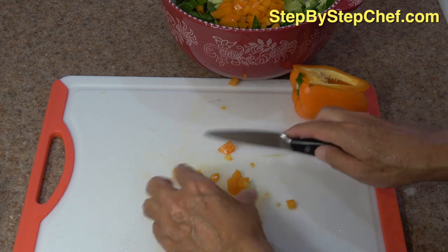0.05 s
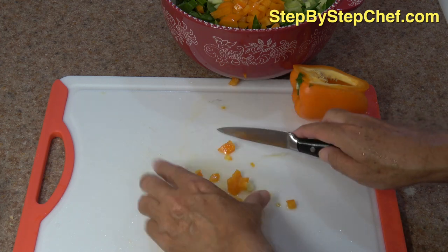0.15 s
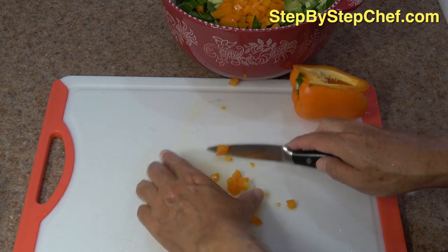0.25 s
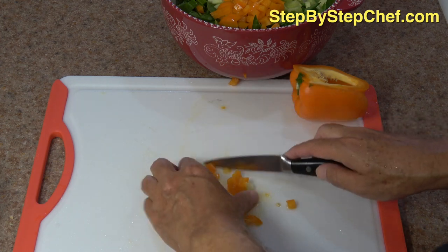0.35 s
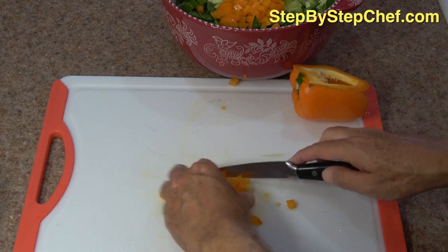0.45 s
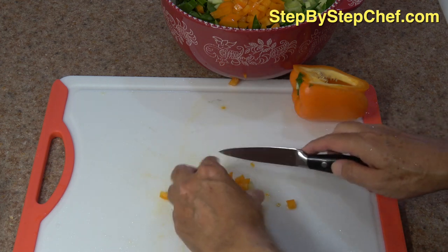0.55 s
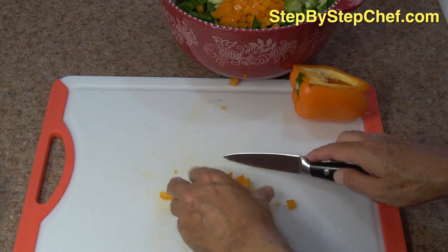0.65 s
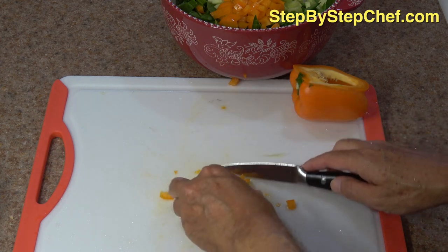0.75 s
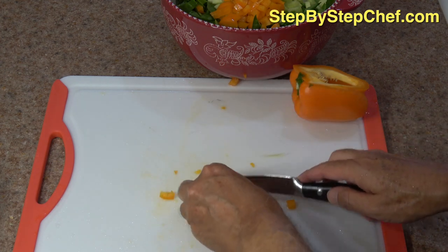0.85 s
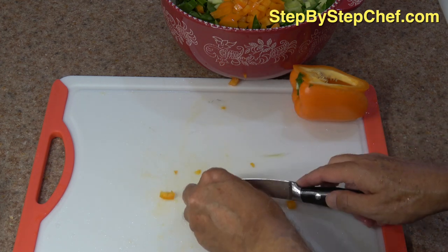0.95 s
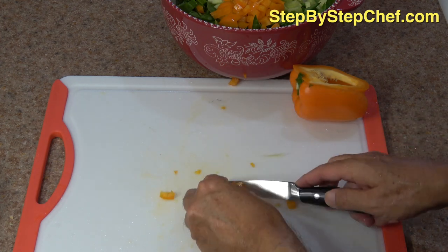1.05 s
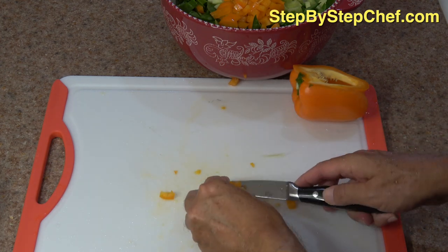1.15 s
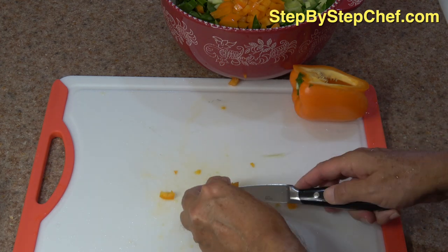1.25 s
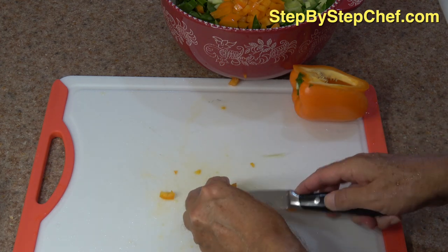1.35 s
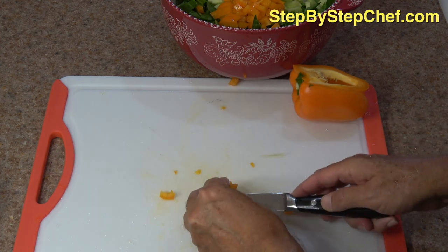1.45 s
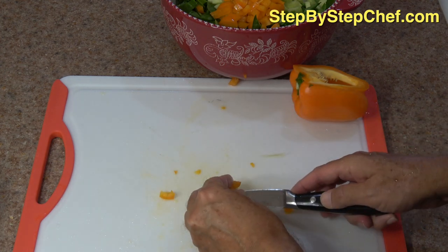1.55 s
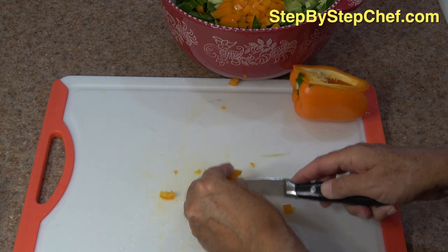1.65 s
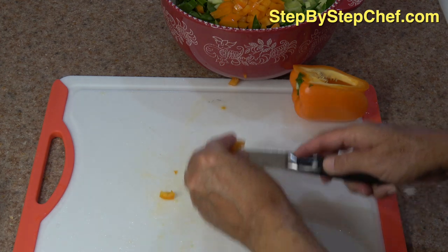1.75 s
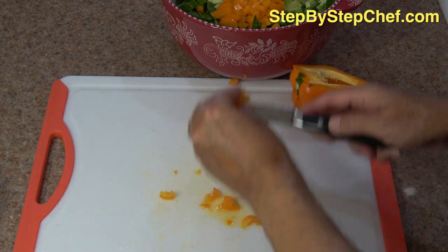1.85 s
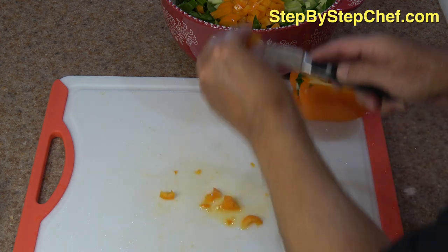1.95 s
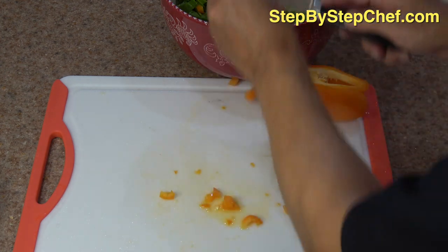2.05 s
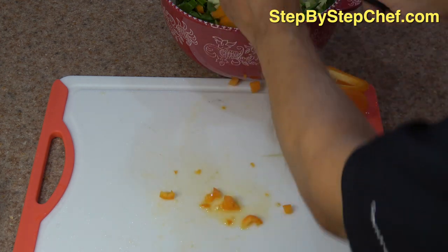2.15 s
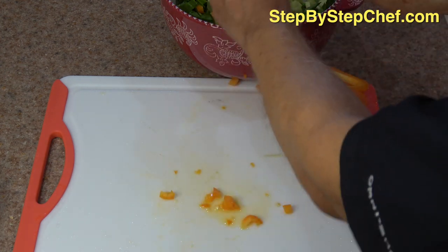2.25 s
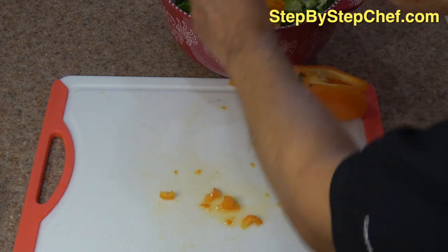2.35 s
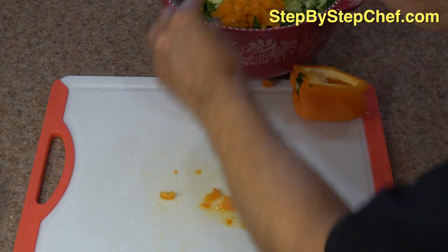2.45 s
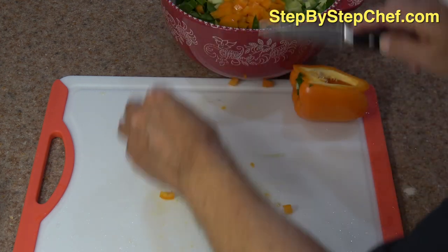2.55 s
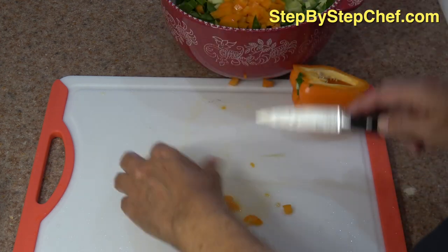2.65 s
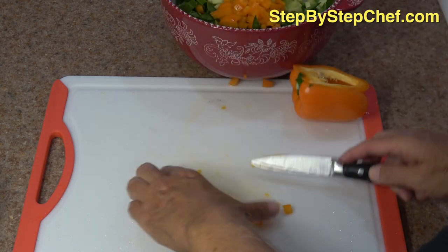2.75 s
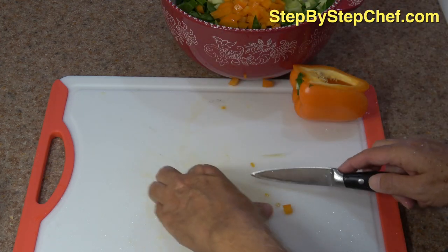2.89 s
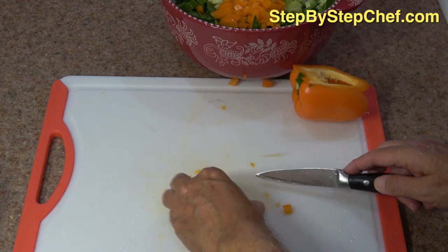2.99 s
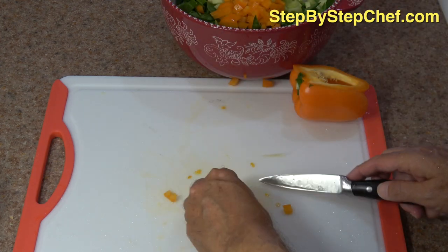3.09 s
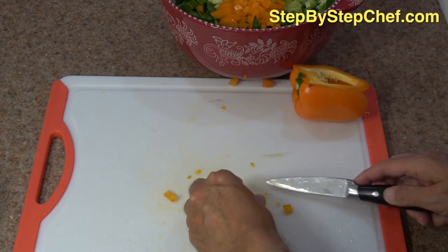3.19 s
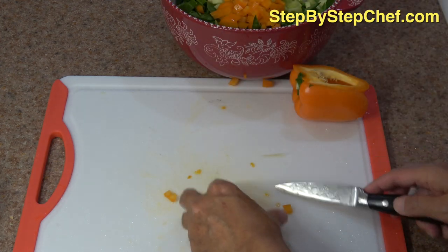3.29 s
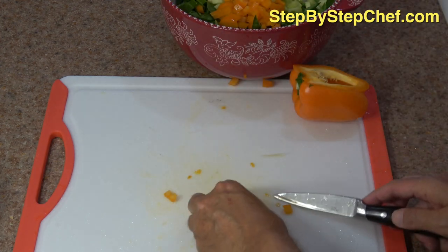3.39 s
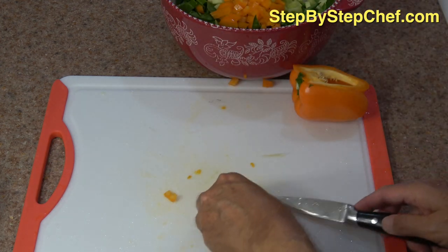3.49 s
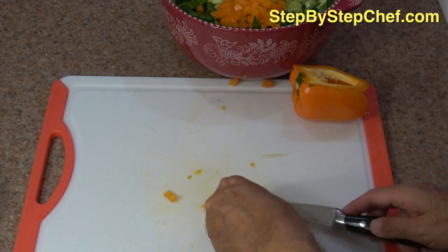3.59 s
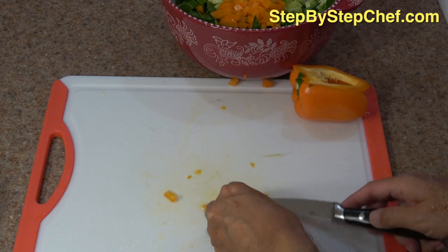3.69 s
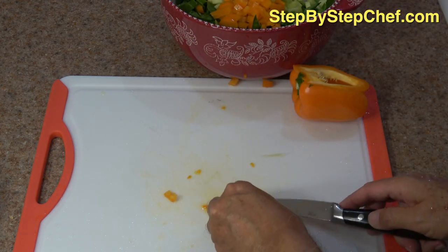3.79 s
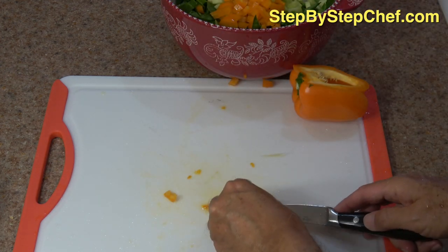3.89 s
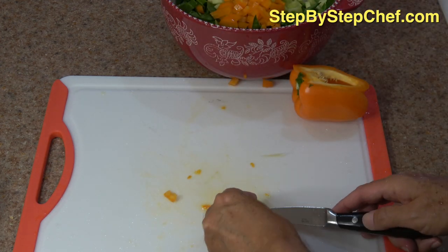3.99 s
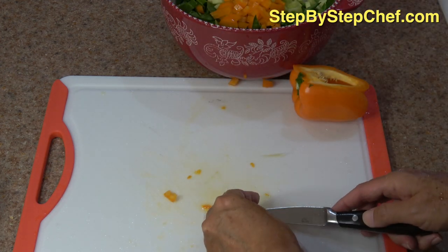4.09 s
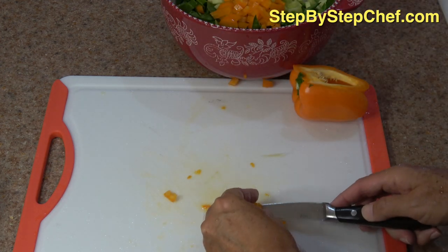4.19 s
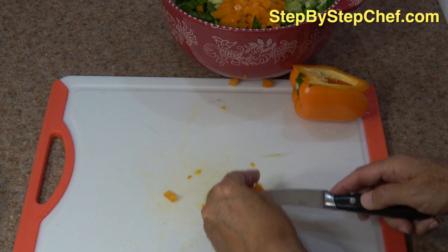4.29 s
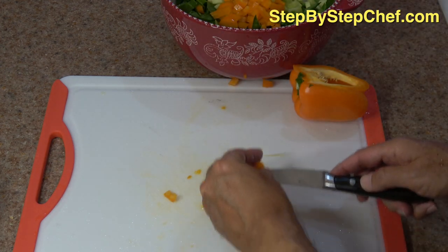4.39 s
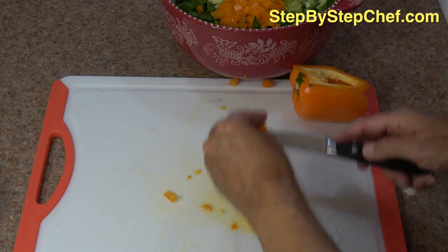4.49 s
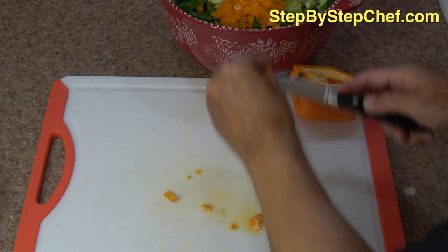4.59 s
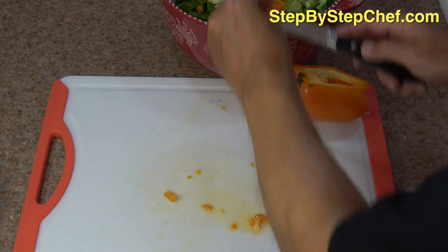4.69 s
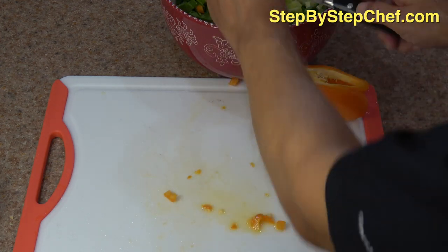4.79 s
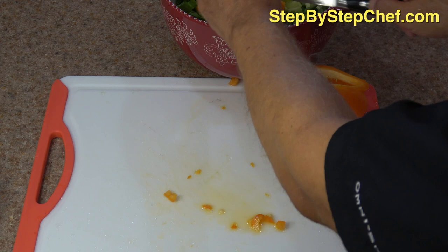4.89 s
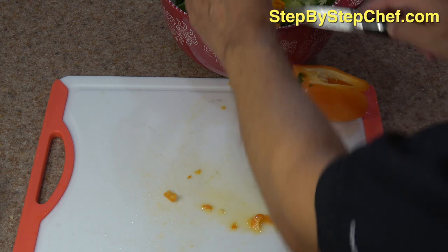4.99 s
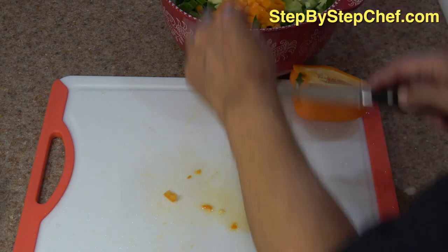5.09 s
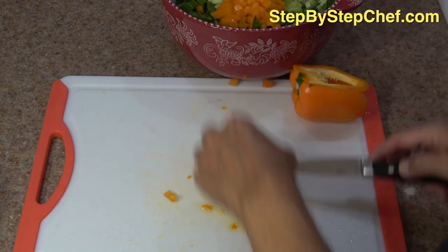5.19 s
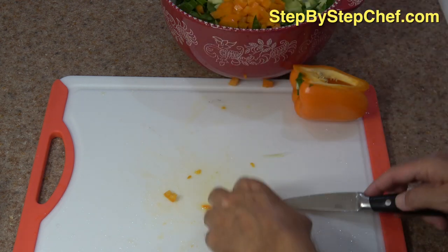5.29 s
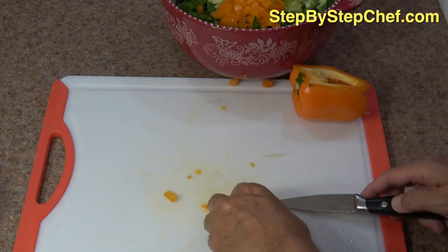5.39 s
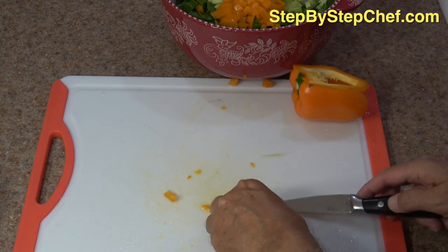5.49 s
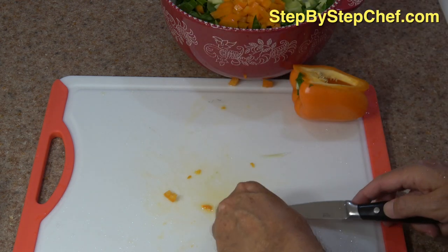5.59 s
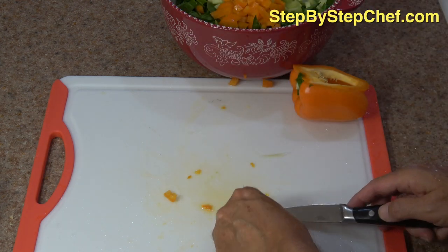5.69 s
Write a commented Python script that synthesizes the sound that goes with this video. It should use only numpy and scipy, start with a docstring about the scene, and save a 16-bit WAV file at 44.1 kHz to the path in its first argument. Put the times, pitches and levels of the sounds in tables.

```python
"""Diced pepper on a cutting board

Close by in a small kitchen, a hand and a small knife gather diced pepper on a plastic board for a bowl.
Pieces judder and crunch: stick-slip noise and force pulses ring the board, with short decaying tones.
The blade scrapes and taps through its own resonances; a sleeve swishes as filtered noise.
A bowl bump and a sharp rap are dying modes; behind them lie a motor hum, fan noise, hiss and a room tail.
"""
import sys
import numpy as np
from scipy import signal
from scipy.fft import rfft, irfft, next_fast_len
from scipy.io import wavfile
from scipy.ndimage import map_coordinates

SR = 44100
rng = np.random.default_rng(int(sys.argv[2]) if len(sys.argv) > 2 else 0)


def dump_mix(stems):
    """Bounce the given channels to the path in sys.argv[1] as a 16-bit WAV at rate SR."""
    frames = np.atleast_2d(stems).T  # one column per channel
    limited = np.clip(frames, -1, 1)  # hard clip at full scale
    pcm = np.round(limited * 32767).astype(np.int16)
    wavfile.write(sys.argv[1], SR, pcm)


N = 253134  # samples


def amp(db):
    """Decibels to gain."""
    return 10 ** (np.asarray(db) / 20)


def unit(x):
    """Scale to rms 1."""
    return x / np.sqrt(np.mean(x ** 2) + 1e-20)


def along(points, hz):
    """Values of (f/Hz, value) points, read on a log frequency axis."""
    f, v = np.transpose(points)
    return np.interp(np.log(hz + 1), np.log(f), v)


def swell(t, peak_s, half_s):
    """A bell-shaped gain that falls to 1/e at half_s either side of its peak."""
    return np.exp(-((t - peak_s) / half_s) ** 2)


def wobble(rate):
    """A smooth random curve, rate knots a second."""
    knots = rng.standard_normal(int(N * rate / SR) + 4)
    return map_coordinates(knots, [np.arange(N) * rate / SR])


def filtered(x, response):
    """Sound shaped by a response of frequency."""
    m = next_fast_len(N + SR // 2)
    return irfft(rfft(x, m) * response(np.fft.rfftfreq(m, 1 / SR)), m)[..., :N]


def convolved(x, response):
    """Sound rung through an impulse response."""
    return signal.fftconvolve(x, response)[:N]


def gains(strokes, rise_s, sag_db_per_s):
    """Rise, sagging hold and fade of each stroke, one gain curve per dB column; rise and fade span 20 dB."""
    t, total = np.arange(N) / SR, 0
    for start_s, hold_s, fade_s, *levels_db in strokes:
        early = np.maximum(start_s - t, 0)
        late = np.maximum(t - start_s - hold_s, 0)
        sag_db = sag_db_per_s * np.clip(t - start_s, 0, hold_s)
        shape_db = -20 * (early / rise_s + late / fade_s) - sag_db
        total = total + np.outer(amp(levels_db), amp(shape_db))
    return total


def body(colour, modes, lo_hz, hi_hz, size=8192, order=8):
    """Minimum-phase impulse response, of energy 1, of one band of a resonant object."""
    hz = np.fft.rfftfreq(size, 1 / SR) + 1
    peaks_db = sum(lift / (1 + (2 * (hz - f) / width) ** 2) for f, width, lift in modes)
    low_cut = 1 + (lo_hz / hz) ** (2 * order)
    high_cut = 1 + (hz / hi_hz) ** (2 * order)
    gain = amp(along(colour, hz) + peaks_db) / np.sqrt(low_cut * high_cut)
    # folding the cepstrum puts all the sound after the blow
    cepstrum = irfft(np.log(gain + 1e-5))
    cepstrum[1:size // 2] *= 2
    cepstrum[size // 2 + 1:] = 0
    response = irfft(np.exp(rfft(cepstrum)))
    return response / np.linalg.norm(response)


def ringing(modes):
    """Impulse response, of energy 1, of a few narrow modes with exponential decay."""
    t = np.arange(SR // 4) / SR
    response = sum(amp(db) * np.exp(-np.pi * width * t) * np.sin(2 * np.pi * hz * t)
                   for hz, width, db in modes)
    # a plate radiates little below its lowest mode
    highpass = signal.butter(4, .8 * modes[0][0], "high", fs=SR, output="sos")
    response = signal.sosfilt(highpass, response)
    return response / np.linalg.norm(response)


def slips(rate, spread_db, smooth_db, clump_db):
    """Stick-slip force of rms 1: clumps of sudden, uneven releases over smooth rubbing."""
    signs = rng.choice([-1, 1], N)
    sizes = amp(spread_db * np.clip(rng.standard_normal(N), -2, 2)) * signs
    releases = unit(sizes * (rng.random(N) < rate / SR))
    force = releases + amp(smooth_db) * rng.standard_normal(N)
    return unit(force * amp(clump_db * np.tanh(wobble(160))))


def blows(times, levels_db, hardness_hz, chatter_db, chatter_s, size=2048):
    """One force pulse per contact and a brief chatter; a softer contact carries less treble."""
    force = np.zeros(N + size)
    fade = amp(chatter_db) * np.exp(-np.arange(size) / SR / chatter_s)
    for s, db, hz in zip(times, levels_db, hardness_hz):
        contact = signal.unit_impulse(size) + fade * rng.standard_normal(size)
        lowpass = signal.butter(2, min(hz, SR / 2 - 1), fs=SR)
        force[round(s * SR):][:size] += amp(db) * signal.lfilter(*lowpass, contact)
    return force[:N]


def struck(event, modes, crack_db, crack_s, crack_hz, attack_s, order):
    """A single blow: a short low-passed crack and freely dying modes; crack_s is its 60 dB decay."""
    s, db = event
    t = np.arange(SR // 2) / SR
    ring = sum(amp(level - 60 * t / t60) * np.sin(2 * np.pi * (hz * t + rng.random()))
               for hz, level, t60 in modes)
    lowpass = signal.butter(order, crack_hz, fs=SR, output="sos")
    noise = unit(signal.sosfilt(lowpass, rng.standard_normal(len(t))))
    crack = amp(crack_db - 60 * t / crack_s) * noise
    blow = (ring + crack) * (1 - np.exp(-t / attack_s))
    # a small body radiates little bass
    blow = signal.sosfilt(signal.butter(2, 180, "high", fs=SR, output="sos"), blow)
    return amp(db) * np.pad(blow, (round(s * SR), N))[:N]


def hiss():
    """Faint shaped noise, opposite in the two channels."""
    floor = [(25, 10), (110, 21), (300, 13.5), (1200, 14.0),
             (2200, -9), (4500, -20), (6000, 5.5), (15000, -7.5)]  # colour: f/Hz, relative level/dB
    side = amp(-64) * unit(filtered(rng.standard_normal(N), lambda hz: amp(along(floor, hz))))
    return np.array([side, -side])


def appliance():
    """A slightly unsteady hum of motor harmonics, with the rush of its fan as shaped noise."""
    # motor harmonics: f/Hz, relative level/dB, left minus right/dB
    harmonics = [(57.7, -13.5, 2), (115.7, 0, 3.5), (173.3, -2, 2), (234, -10, 4), (283, -31, 1)]
    # colour of the fan's rush: f/Hz, relative level/dB
    fan_colour = [(20, -6.5), (32, -1), (42, -14), (60, -0.5), (88, 1), (140, -6), (220, -9.5), (330, -9),
                  (550, -14), (700, -9.5), (950, -12), (1100, -7.5), (1270, -11), (1430, -21),
                  (2100, -27.5), (15500, -37)]
    motor_db, waver_db = -51.5, 0.5  # gain of the whole hum and its slow wavering
    t, hum = np.arange(N) / SR, 0
    for hz, db, pan_db in harmonics:
        phase = 2 * np.pi * (hz * t + rng.random()) + 0.2 * wobble(2.99)
        tone = np.sqrt(2) * np.sin(phase)
        hum = hum + tone * amp(db + 0.94 * wobble(3.14)) * amp([[pan_db / 2], [-pan_db / 2]])
    rush = unit(filtered(rng.standard_normal(N), lambda hz: amp(along(fan_colour, hz))))
    return amp(motor_db + waver_db * wobble(3.96)) * hum + amp(-52.0) * rush


def reverb(x):
    """The kitchen's diffuse tail: decaying noise in which each frequency dies at its own speed."""
    # decay of the room: f/Hz, t60/s
    kitchen = [(150, 0.74), (600, 0.41), (1500, 0.41), (3500, 0.35), (7000, 0.43), (14000, 0.36)]
    hz, t, z = signal.stft(rng.standard_normal(SR * 3 // 4), SR, nperseg=256)
    decay = amp(-60 * t / along(kitchen, hz)[:, None])
    tail = signal.istft(z * decay, SR, nperseg=256)[1]
    delay = np.zeros(SR // 160)  # about 6 ms before the tail
    return convolved(x, np.concatenate([delay, tail / np.linalg.norm(tail)]))


def sleeve():
    """Cloth fibres slide softly, loudest as the arm moves fastest to the bowl and back."""
    # swings of the arm: fastest moment t/s, half length/s, swish level/dB
    swings = [(2.17, 0.14, -56), (2.52, 0.19, -62.5), (4.79, 0.15, -56.5), (5.164, 0.19, -61)]
    # colour of the cloth: f/Hz, relative level/dB
    cloth = [(400, -6), (1000, 0.5), (2000, 2), (4000, -2), (8000, -5), (11000, -9.5), (15500, -21)]
    fibres = slips(rate=3000, spread_db=11.0, smooth_db=4.5, clump_db=0.0)
    t = np.arange(N) / SR
    speed = sum(amp(db) * swell(t, s, half_s) for s, half_s, db in swings)
    return speed * unit(filtered(fibres, lambda hz: amp(along(cloth, hz))))


def bowl():
    """The bowl is bumped once: its modes die freely behind a dull crack."""
    # the bump: t/s, level/dB
    bump = (2.0995, -27)
    # modes of the bowl: f/Hz, relative level/dB, t60/s
    modes = [(275, -7.5, 0.046), (442, -6.5, 0.032), (654, -8, 0.093), (740, 3.5, 0.043), (870, -1, 0.066),
             (1050, -4, 0.025), (1180, -2, 0.029), (1360, -3, 0.019)]
    return struck(bump, modes, crack_db=-1.5, crack_s=0.033, crack_hz=1300, attack_s=0.00057, order=4)


def rap():
    """One sharp rap on the board: short modes and a bright crack."""
    # the rap: t/s, level/dB
    hit = (2.859, -14)
    # modes it excites: f/Hz, relative level/dB, t60/s
    modes = [(273, -13.5, 0.059), (383, -19.5, 0.12), (750, 1, 0.043), (1593, -7.5, 0.027),
             (2710, -8.5, 0.019), (3060, -4.5, 0.016), (3260, -7.5, 0.027), (3650, -4, 0.021),
             (5400, -5, 0.0084), (9020, -16.5, 0.012)]
    return struck(hit, modes, crack_db=-10.0, crack_s=0.017, crack_hz=4500, attack_s=0.00024, order=2)


def knife():
    """The edge catches on the scored plastic; the catches set the steel singing, and its taps tick."""
    # strokes over the board: t/s, hold/s, fade/s, relative body/dB, rasp/dB, edge hiss/dB,
    # steel ring against rasp/dB
    scrapes = [(0.405, 0.025, 0.1, -41, -42, -49, -25), (1.234, 0.01, 0.028, -44, -57, -54, -21.5),
               (1.274, 0.0056, 0.066, -42, -44.5, -53, -20), (1.413, 0.008, 0.068, -43.5, -43, -49, -27),
               (1.433, 0.016, 0.022, -37.5, -48.5, -59, -28), (3.509, 0.061, 0.047, -33, -37.5, -50, -8),
               (3.589, 0.008, 0.049, -33, -35.5, -45, -2), (3.605, 0.0073, 0.18, -37.5, -38.5, -56, -19),
               (3.809, 0.012, 0.08, -37, -42, -55, -1), (3.898, 0.0048, 0.024, -34.5, -30.5, -44, -3.5),
               (3.942, 0.0055, 0.084, -40.5, -42.5, -50.5, -3),
               (4.031, 0.008, 0.086, -45, -47, -56.5, -5.5), (5.359, 0.008, 0.17, -54, -56.5, -72, -20),
               (5.515, 0.017, 0.035, -50.5, -59, -60, 2), (5.573, 0.013, 0.046, -37, -36.5, -47, -1.5),
               (5.644, 0.011, 0.031, -38.5, -49, -53.5, 3), (5.692, 0.0051, 0.029, -41, -43.5, -58, -2)]
    # ticks of the blade: t/s, relative level/dB, contact hardness as cutoff f/Hz
    tick_rows = [(0.183, -14, 8400), (0.24, -33, 14000), (1.2757, -31, 12300), (1.41, -36.5, 12100),
                 (2.356, -40, 14000), (2.6814, -34, 4520), (3.091, -23.5, 4900), (3.3529, -38, 5000),
                 (3.5, -30.5, 6000), (3.587, -26, 8100), (3.7998, -26.5, 8800), (3.897, -19, 12100),
                 (3.946, -25, 9000), (5.361, -33.5, 3500), (5.5663, -25.5, 9000), (5.6899, -27, 12000)]
    # broad colour of the scrape: f/Hz, relative level/dB
    colour = [(120, -19.5), (270, -1), (490, -11.5), (700, -1.5), (870, -9.5), (1150, -7), (1600, -9),
              (2050, -23.5), (2700, -14.5), (3700, -15), (5600, -17.5), (9000, -25), (12500, -37.5),
              (15500, -55)]
    # resonances that stand out of it: f/Hz, width/Hz, lift/dB
    modes = [(1037, 57, 7.3), (1590, 130, 4.3), (2530, 150, 4.5), (3336, 190, 7), (4200, 72, 3.6),
             (6640, 160, 7.7), (8630, 580, 8.4), (11300, 370, 10)]
    # the steel's ringing modes: f/Hz, width/Hz, relative level/dB
    blade = [(2740, 44, -5), (3070, 110, 4), (3324, 34, -0.5), (4540, 35, -16), (4980, 34, -4)]
    strokes = [(*timing, db, rasp_db, edge_db, rasp_db + ring_db)
               for *timing, db, rasp_db, edge_db, ring_db in scrapes]
    # the edge bites fast
    body_gain, rasp_gain, edge_gain, ring_gain = gains(strokes, rise_s=0.015, sag_db_per_s=29)
    catches = slips(rate=1300, spread_db=7.5, smooth_db=2.5, clump_db=1.5)
    drone = convolved(catches * body_gain, body(colour, modes, 145, 2260))
    rasp = convolved(catches * rasp_gain, body(colour, modes, 1890, 4960))
    edge = convolved(catches * edge_gain, body(colour, modes, 5440, 17000))
    ring = convolved(catches * ring_gain, ringing(blade))
    tick = body(colour, modes, 1570, 17000)
    taps = blows(*np.transpose(tick_rows), chatter_db=-13.5, chatter_s=0.0088)
    ticks = convolved(taps, tick / np.abs(tick).max())
    return amp(-2.5) * drone + amp(-6.5) * (rasp + ring) + amp(-5.0) * edge + amp(-7.0) * ticks


def slip_run():
    """The hand sticks and slips in a quick, even run that swells and dies away, as rows of knocks."""
    start_s, period_s, count = 0.2417, 0.0187, 5
    peak_s, half_s = 0.267, 0.037
    strongest_db, snap_db, hardness_hz = -3.5, -4.5, 5400  # strength at the peak, snap against body
    times = start_s + period_s * np.arange(count)
    levels_db = strongest_db + 20 * np.log10(swell(times, peak_s, half_s))
    return [(s, db, snap_db, hardness_hz) for s, db in zip(times, levels_db)]


def crunches(size=640, count=2000):
    """Sparse crisp crunches of rms 1, each ringing briefly at a pitch of its own."""
    rate_per_s, centre_hz, log_spread = 220, 3690, 0.13
    life_cycles, scatter_db = 5, 3
    pitch, strength = rng.standard_normal((count, 2)).T
    starts = np.cumsum(rng.exponential(SR / rate_per_s, count)).astype(int)
    cycles = np.outer(centre_hz * np.exp(log_spread * pitch), np.arange(size) / SR)
    sizes = amp(scatter_db * np.clip(strength, -2, 2))[:, None]
    grains = sizes * np.sin(2 * np.pi * cycles) * np.exp(-cycles / life_cycles)
    places = starts[:, None] + np.arange(size)
    return unit(np.bincount(places.ravel(), grains.ravel(), N)[:N])


def board():
    """Wet pieces judder under the hand; slips and knocks ring the same plastic board."""
    # pushes of the pieces: t/s, hold/s, fade/s, relative body/dB, rasp/dB,
    # hand's weight against body/dB, crunch against rasp/dB
    sweeps = [(0.0, 0.012, 0.12, -35, -44, -14, -4.5), (0.2, 0.019, 0.032, -30.5, -41.5, -22, -1),
              (0.245, 0.071, 0.19, -16, -29.5, -17.5, -5.5), (0.772, 0.051, 0.087, -20, -27.5, -4, -16),
              (0.87, 0.057, 0.032, -21, -31, -5, -11), (0.981, 0.067, 0.13, -33.5, -42.5, -15, -17),
              (1.201, 0.01, 0.065, -46, -65, 2, -12), (2.79, 0.0061, 0.031, -38, -54, -16, -12),
              (2.829, 0.042, 0.028, -29.5, -44.5, -11, -15), (2.915, 0.0088, 0.15, -43, -45.5, -11, -14),
              (2.962, 0.021, 0.16, -34, -44, -22, -15), (3.08, 0.016, 0.075, -39.5, -40.5, -20, -12),
              (3.478, 0.012, 0.054, -43.5, -61, -20, -10)]
    # knocks on the board: t/s, relative level/dB, snap against body/dB, contact hardness as cutoff f/Hz
    knocks = [(0.1834, -4.5, -2, 7900), (0.668, -6.5, 11.5, 540), (0.767, -11.5, -7, 3000),
              (0.8673, -12, -19, 5000), (0.9253, -14, 0, 3470), (1.077, -16, -14, 1170),
              (2.7879, -25.5, -3, 2500), (2.8273, -23, -5, 4000), (2.8584, -19, 7, 8000),
              (3.197, -28.5, 2.5, 4560)]
    # broad colour of the board: f/Hz, relative level/dB
    colour = [(90, -24), (170, -28), (240, -8.5), (400, -9.5), (520, -15), (720, -3.5), (1050, -8),
              (1550, -13.5), (1900, -27), (2500, -18), (4000, -24), (5500, -37.5), (9000, -44),
              (15500, -66)]
    # resonances that stand out of it: f/Hz, width/Hz, lift/dB
    modes = [(266, 24, 12), (286, 13, 9), (390, 25, 3.5), (663, 48, 3), (781, 42, 8.5), (950, 37, 2),
             (1105, 11, 5), (1224, 34, 8), (1458, 46, 4), (2233, 19, 6.5), (4260, 290, 2), (6640, 270, 9.5),
             (11060, 600, 9)]
    # low modes under the hand's weight: f/Hz, width/Hz, relative level/dB
    loaded = [(232.7, 8.4, -3), (262, 16, -13), (390, 13, -4.5)]
    low = body(colour, modes, 107, 2080)
    high = body(colour, modes, 1960, 23000)
    pushes = [(*timing, db, rasp_db, db + weight_db, rasp_db + crunch_db)
              for *timing, db, rasp_db, weight_db, crunch_db in sweeps]
    # a push builds up, then eases a little while it lasts
    body_gain, rasp_gain, weight_gain, crunch_gain = gains(pushes, rise_s=0.033, sag_db_per_s=37.5)
    judder = slips(rate=600, spread_db=1.5, smooth_db=-5, clump_db=0.0)
    fine_slips = slips(rate=2500, spread_db=4.5, smooth_db=-5.0, clump_db=17)
    grit = unit(judder + amp(-1.5) * fine_slips)
    rub = amp(-4) * convolved(judder * body_gain, low)
    rasp = amp(-4.0) * convolved(grit * rasp_gain, high)
    boom = amp(-3.5) * convolved(judder * weight_gain, ringing(loaded))
    crunch = crunch_gain * crunches()
    s, db, snap_db, hardness_hz = np.transpose([*knocks, *slip_run()])
    thud_force = blows(s, db, hardness_hz, chatter_db=-48.0, chatter_s=0.022)
    snap_force = blows(s, db + snap_db, hardness_hz, chatter_db=-18.5, chatter_s=0.0084)
    thud = convolved(thud_force, low / np.abs(low).max())
    snap = convolved(snap_force, high / np.abs(high).max())
    return rub + rasp + crunch + boom + amp(-2.5) * thud + amp(-7.5) * snap


def scene():
    """Direct sound, one near reflection and the room, heard almost in mono, over appliance and hiss."""
    # sideways sound from the room: f/Hz, level/dB
    width = [(200, -24.5), (700, -21.5), (1300, -26), (4000, -32), (7000, -14), (15000, -18)]
    work = sleeve() + bowl() + rap() + knife() + board()
    echo = filtered(work, lambda hz: np.exp(-2j * np.pi * hz * .004))  # 4 ms later
    mid = work + amp(-13.5) * echo + amp(-5.5) * reverb(work)
    side = filtered(reverb(work), lambda hz: amp(along(width, hz)))
    return np.array([mid + side, mid - side]) + appliance() + hiss()


def record(dry):
    """The microphone's signal keeps nothing above a sharp band limit."""
    top_hz = 15750
    return filtered(dry, lambda hz: hz < top_hz)


dry = scene()
out = record(dry)
dump_mix(out)
```